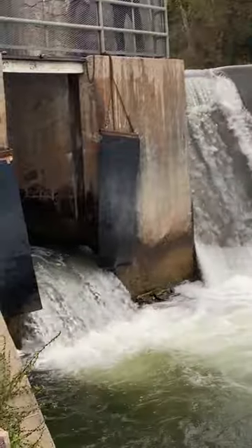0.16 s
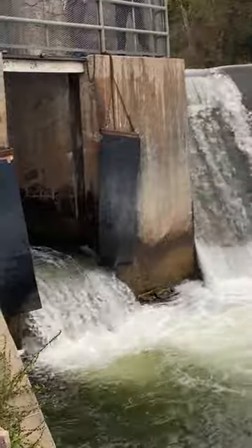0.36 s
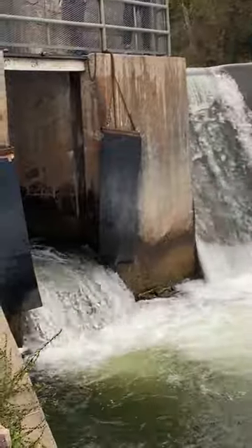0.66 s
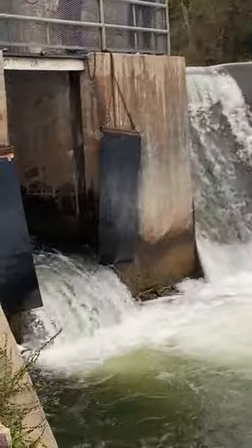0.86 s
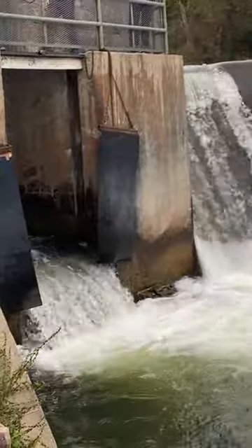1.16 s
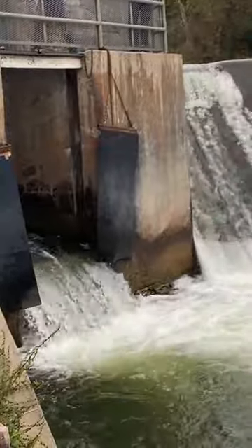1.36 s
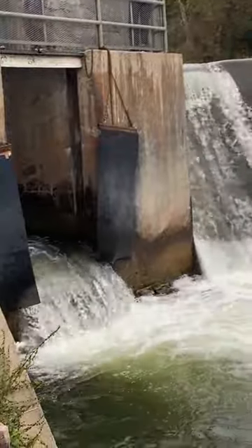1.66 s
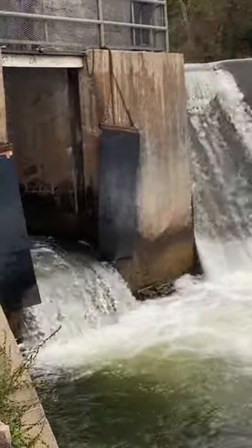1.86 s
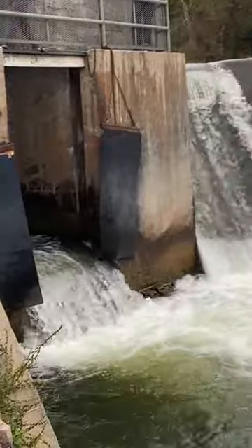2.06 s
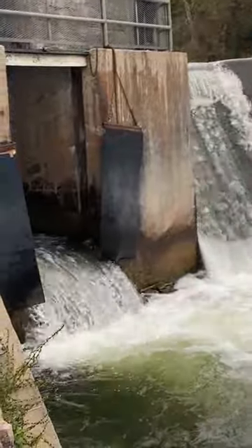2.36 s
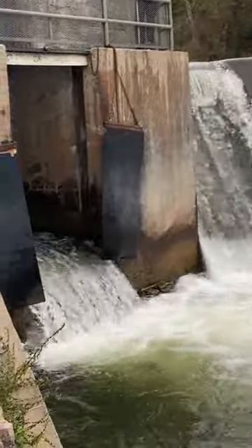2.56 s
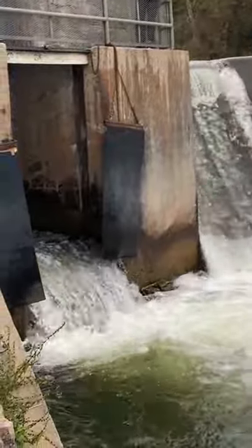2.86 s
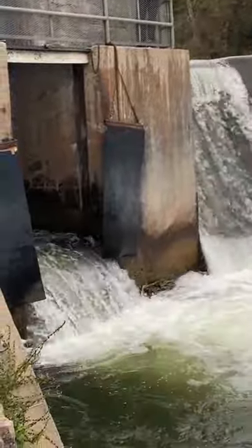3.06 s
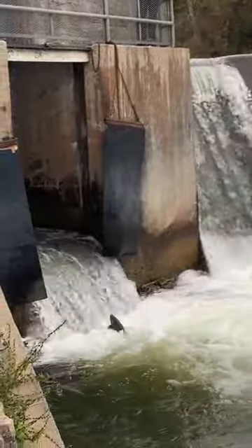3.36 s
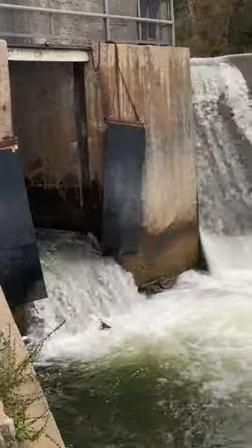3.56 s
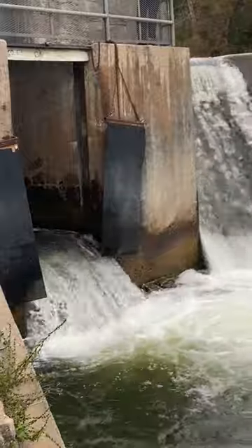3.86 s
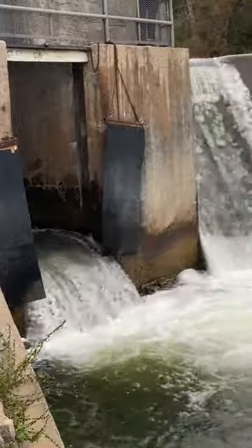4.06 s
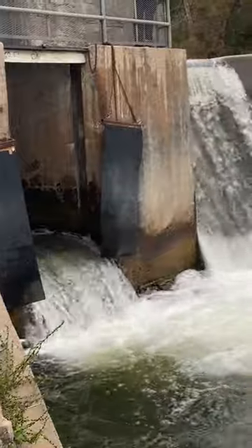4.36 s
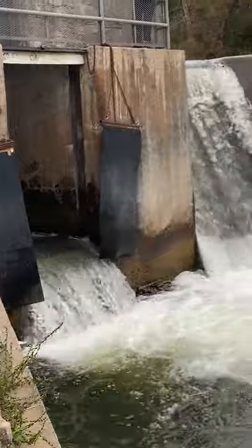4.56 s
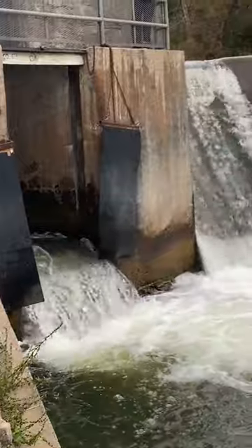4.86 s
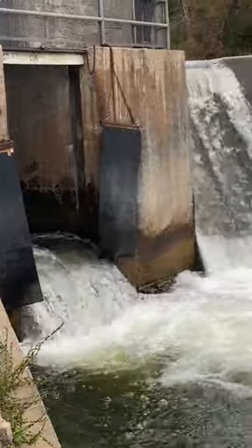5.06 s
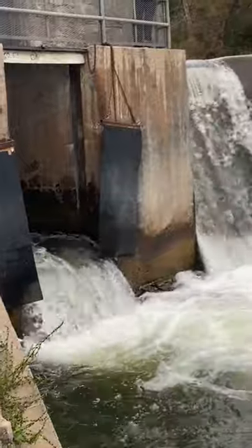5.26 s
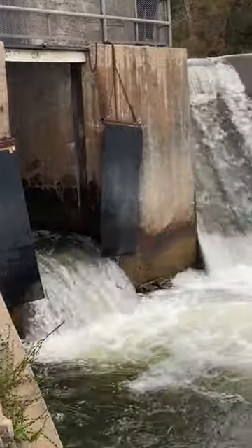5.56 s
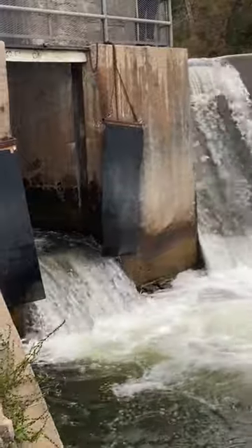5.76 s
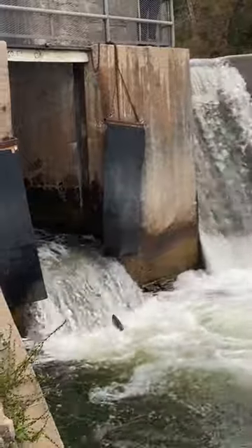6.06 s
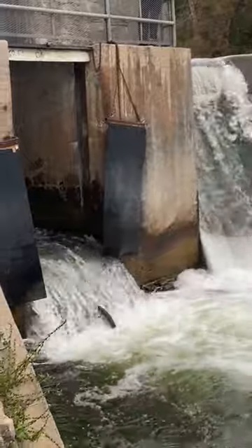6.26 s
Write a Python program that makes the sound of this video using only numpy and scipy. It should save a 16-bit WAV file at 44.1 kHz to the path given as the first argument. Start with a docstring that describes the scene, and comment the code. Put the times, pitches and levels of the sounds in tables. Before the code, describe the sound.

Water pours loudly and steadily over a concrete weir and through a sluice gate, rumbling, roaring and hissing into a churning pool.

```python
"""Weir and sluice gate

Water pours over a concrete weir and through a sluice gate into a churning pool, heard from the bank.
Filtered noise, lifted by surges, makes the rumble; patchy noise makes the pounding jets, the white-water
roar and the spray hiss. Swarms of damped rings add bubbles and drops; swelling, rising tones gulp and
plop; the gate chamber booms a little. Two closely spaced microphones hear it all, with level, phase and
likeness set over frequency."""
import sys
import numpy as np
from scipy import signal
from scipy.fft import rfft, irfft
from scipy.io import wavfile
from scipy.ndimage import uniform_filter1d

SR = 44100
rng = np.random.default_rng(int(sys.argv[2]) if len(sys.argv) > 2 else 0)


def persist_wave(psi):
    """Save psi, clipped to +-1, as 16-bit WAV."""
    counts = np.round(np.clip(psi, -1, 1) * 32767).astype(np.int16)
    wavfile.write(sys.argv[1], SR, np.atleast_2d(counts).T)


N = 282681
HZ = np.fft.rfftfreq(N, 1 / SR)
T_S = np.arange(N) / SR


def gain_of(db):
    """Decibels to amplitude."""
    return 10 ** (np.asarray(db) / 20)


def evened(x):
    """Scales to rms 1."""
    return x / np.sqrt(np.mean(x ** 2) + 1e-20)


def read(points):
    """Interpolates a table over HZ, on a log frequency axis."""
    f_hz, value = np.transpose(points)
    return np.interp(np.log(HZ + 1), np.log(f_hz + 1), value)


def coloured(x, db):
    """Filters x by the gain curve db, to rms 1."""
    return evened(irfft(rfft(x) * gain_of(db), N))


def steadied(x, size=11025):
    """Divides out slow loudness drifts, keeping fast flutter; size in samples."""
    power = uniform_filter1d(x ** 2, size, axis=1)
    power = uniform_filter1d(power, size // 2, axis=1)
    return x / np.sqrt(abs(power) + 1e-12)


def turbulence(patch_s, patch_hz, patchy_db):
    """Two unrelated noises whose level varies in short patches of time and frequency."""
    window, hop = 256, 64
    shape = (2, N // hop + 5, window // 2 + 1)
    re, im, patches = rng.standard_normal((3, *shape))
    span_frames, span_bins = patch_s * SR / hop, patch_hz * window / SR
    for axis, span in ((1, span_frames), (2, span_bins)):
        keep = np.exp(-1 / max(span, 1e-3))
        patches = signal.lfilter([1], [1, -keep], patches, axis=axis)
    z = (re + 1j * im) * gain_of(patchy_db * evened(patches))
    _, noise = signal.istft(z, nperseg=window, noverlap=window - hop, time_axis=1, freq_axis=2)
    return evened(noise[:, :N])


def rings(lo_hz, hi_hz, per_s, cycles, rise, spread_db, count=160):
    """A swarm of damped rings of many pitches and sizes; each climbs in pitch as it dies."""
    out = np.zeros((2, N))
    per_pitch = int(per_s * N / SR / count)
    for hz in np.geomspace(lo_hz, hi_hz, count):
        # age in decay times; one decay lasts the given cycles
        age = np.arange(int(5 * cycles * SR / hz) + 2) * hz / (SR * cycles)
        turns = cycles * (age + rise * age ** 2 / 2)
        ring = np.sin(2 * np.pi * turns) * np.exp(-age)
        ring *= np.sqrt(hz) / np.linalg.norm(ring)  # equal energy per Hz over log-spaced pitches
        place, chance, side = rng.random((per_pitch, 3)).T
        size = gain_of(spread_db * np.minimum(-np.log(1 - chance), 4))
        at = (place * N).astype(int)[:, None] + np.arange(len(ring))
        channel = (side * 2).astype(int)[:, None]
        np.add.at(out, (channel, at % N), size[:, None] * ring)
    return evened(out)


def sway(slow_hz, fast_hz, count=24):
    """Slow random wavering, a sum of sines at random phases, rms 1."""
    coarse = np.arange(0, N, 128)
    turns = np.geomspace(slow_hz, fast_hz, count)[:, None] * coarse / SR + rng.random((count, 1))
    waver = np.sin(2 * np.pi * turns).sum(0)
    return evened(np.interp(np.arange(N), coarse, waver))


# heavier slugs of water, negative = dip: peak t/s, rumble lift level/dB
SURGES = [(0.12, 4), (0.38, 4.5), (0.5, 2.5), (0.6, 0), (0.8, 0.5), (1.03, 4.5), (1.28, 0), (1.55, 1.2),
          (3.56, 2.5), (4.5, -3), (5.35, 1.3)]
SURGE_RISE_S, SURGE_EBB_S = 0.079, 0.15


def surge_db():
    """Plunge lift over time: Gaussian build-up, exponential ebb."""
    peak_s, lift_db = np.array(SURGES).T
    age_s = T_S - peak_s[:, None]
    shape = np.exp(-np.where(age_s < 0, (age_s / SURGE_RISE_S) ** 2, age_s / SURGE_EBB_S))
    return lift_db @ shape


# rumble spectrum: f/Hz, relative level/dB per Hz
RUMBLE = [(15, -44), (23, -22), (31, -11), (40, -7.5), (50, 4), (70, 0), (100, 2.3), (125, -12.5),
          (170, -36)]
RUMBLE_DB = -30.5


def rumble(sway_db=0.5):
    """The whole plume of trapped air heaves under the fall, following each surge in full."""
    heave = coloured(rng.standard_normal((2, N)), read(RUMBLE))
    force_db = surge_db() + sway_db * sway(slow_hz=1.4, fast_hz=4.7)
    return gain_of(RUMBLE_DB + force_db) * steadied(heave, size=5000)


# pounding spectrum without the chamber: f/Hz, relative level/dB per Hz
POUNDING = [(70, -35), (100, -6), (122, 0), (160, -2.5), (200, -1), (255, -2.5), (345, -4.5), (400, -10),
            (450, -19.5), (600, -46)]
POUNDING_DB, POUNDING_SHARE = -24.5, 0.14  # share of the surge lift
CHAMBER_HZ, CHAMBER_WIDTH_HZ, CHAMBER_LIFT_DB = 294.5, 32, 3.6


def pounding(sway_db=0.27):
    """Large air pockets thud in the plunge; the gate chamber's resonance lifts one band."""
    boom_db = CHAMBER_LIFT_DB / (1 + (2 * (HZ - CHAMBER_HZ) / CHAMBER_WIDTH_HZ) ** 2)
    thuds = turbulence(patch_s=0.046, patch_hz=150, patchy_db=1.26)
    thuds = coloured(thuds, read(POUNDING) + boom_db)
    force_db = POUNDING_SHARE * surge_db() + sway_db * sway(slow_hz=2.2, fast_hz=6.5)
    return gain_of(POUNDING_DB + force_db) * steadied(thuds, size=5000)


# white-water spectrum: f/Hz, relative level/dB per Hz
CHURN = [(300, -29), (420, -6), (470, -2), (530, -1.5), (680, 0), (800, -2), (940, -7.5), (1080, -6.5),
         (1350, -5.5), (1740, -6.5), (1900, -11.5), (2130, -8), (2650, -14), (3600, -28)]
CHURN_DB, LARGE_BUBBLES_HZ = -25.5, 1000  # large bubbles ring below this pitch


def churn(wash_db=0.0, bubbles_db=-7.5):
    """Countless bubbles merge with the wash into a roar, large and small steadied apart."""
    wash = turbulence(patch_s=.012, patch_hz=300, patchy_db=0.1)
    bubbles = rings(lo_hz=351.3, hi_hz=3204, per_s=3500, cycles=11.5, rise=.015, spread_db=-1)
    water = gain_of(wash_db) * wash + gain_of(bubbles_db) * bubbles
    water = coloured(water, read(CHURN))
    large = irfft(rfft(water) * (HZ < LARGE_BUBBLES_HZ), N)
    small = water - large
    roar = sum(part.std() * steadied(part, size=4000) for part in (large, small))
    return gain_of(CHURN_DB) * roar


# spray spectrum: f/Hz, relative level/dB per Hz
SPRAY = [(1800, -28), (2600, -3.5), (2900, 1.3), (3100, -.3), (3350, .6), (3520, -1.9), (3900, -.6),
         (4150, -.9), (4350, -2.7), (4700, -2.4), (5000, -3.1), (5300, -1.8), (5650, -2.5), (6000, -.9),
         (6250, -.9), (6420, -2.8), (6850, -.9), (7020, -3.3), (7300, -2.4), (7550, -4.1), (8150, -1.3),
         (8500, -2.6), (10000, -4.3), (11100, -4.5), (11500, -6), (12200, -5.4), (13300, -8.3),
         (15600, -8.7)]
SPRAY_DB = -27.9


def spray(hiss_db=0.0, drops_db=-6.5):
    """Bursting foam hisses as patchy noise; thrown drops patter as short rings."""
    hiss = turbulence(patch_s=0.02, patch_hz=600, patchy_db=1.63)
    drops = rings(lo_hz=2010, hi_hz=15990, per_s=12000, cycles=13.0, rise=0.021, spread_db=2.0)
    water = gain_of(hiss_db) * hiss + gain_of(drops_db) * drops
    return gain_of(SPRAY_DB) * steadied(coloured(water, read(SPRAY)))


def pockets(rows, swell_s, decay_s, octaves_per_s):
    """Each air pocket swells, rings and dies, climbing in pitch; shared part of the field only."""
    out = np.zeros(N)
    for (peak_s, hz, db), turn in zip(rows, rng.random(len(rows))):
        age_s = T_S - peak_s
        near = abs(age_s) < .25
        age_s = age_s[near]
        swell = np.exp(-np.where(age_s < 0, (age_s / swell_s) ** 2, age_s / decay_s))
        turns = turn + np.cumsum(hz * 2 ** (octaves_per_s * age_s)) / SR
        out[near] += gain_of(db) * swell * np.sin(2 * np.pi * turns)
    return np.array([out, np.zeros(N)])


# big trapped-air pockets: peak t/s, f/Hz at peak, level/dB ahead of the microphones
GULPS = [(0.08, 137.5, -21), (0.097, 274, -22.5), (0.129, 65, -21), (0.179, 81.2, -19), (0.358, 75, -15),
         (0.405, 70, -21), (0.456, 328, -23), (0.476, 70, -26), (0.486, 102, -23.5), (0.572, 113.7, -27),
         (0.617, 75.3, -22), (0.54, 196, -23), (0.62, 258, -24), (0.63, 199.7, -22), (0.708, 64, -20),
         (0.87, 280, -24.5), (0.99, 54.3, -21), (1.036, 291, -21), (1.08, 70, -23), (1.162, 129.3, -23),
         (1.232, 296, -24), (1.29, 74.4, -21), (1.295, 310, -25.5), (1.55, 145, -23), (1.602, 231, -21.5),
         (1.785, 178, -18.5), (2.154, 314, -20), (2.254, 173, -23), (2.68, 301, -18), (2.914, 291, -19),
         (2.992, 301, -20), (3.056, 301, -25), (3.167, 124.5, -23), (3.55, 45, -21), (3.648, 107.3, -24),
         (3.927, 69.5, -21), (4.381, 285, -23), (4.499, 75.9, -23), (4.634, 103, -27), (4.728, 275, -24),
         (4.802, 118, -22), (5.158, 253, -23), (5.288, 122.7, -21), (5.359, 269, -21.5),
         (5.416, 143.3, -24), (5.519, 296, -20.5), (5.625, 134.7, -19), (5.75, 113.3, -26),
         (6.181, 296, -23)]


def gulps():
    """Big pockets of trapped air gulp in the plunge, rising in pitch as they ascend."""
    return pockets(GULPS, swell_s=.02, decay_s=.025, octaves_per_s=.9)


# bubble clouds: peak t/s, length/s, centre f/Hz, lift level/dB
BOILS = [(0.134, 0.074, 680, 3.5), (0.408, .08, 680, 2.5), (0.768, .12, 680, 2.5), (0.82, .2, 1500, 1.3),
         (1.5, .2, 680, 2.3), (1.76, .14, 1400, 1), (1.934, .12, 680, 3), (2.2, 0.17, 1650, 1.3),
         (2.72, .16, 680, 1.4), (3.17, .24, 704, 2.2), (3.52, 0.062, 680, 4), (3.76, .08, 1400, 1.6),
         (4.07, .07, 680, 2.3), (4.17, .07, 680, 4), (4.31, .15, 660, 3.5), (4.55, .14, 1400, 1.7),
         (4.93, .25, 680, 1.8), (5.13, .08, 1450, 2), (5.63, 0.072, 680, 2), (5.64, .14, 1500, 2)]
BOIL_OCTAVES, BETWEEN_BOILS_DB = 0.38, -.5  # 1/e half-width in pitch; roar gain between clouds


def boiling(water):
    """Each cloud of bubbles that wells up lifts the roar around its own pitch."""
    out = water * gain_of(BETWEEN_BOILS_DB)
    for peak_s, length_s, hz, lift_db in BOILS:
        near = abs(T_S - peak_s) < 2 * length_s
        part = water[:, near]
        size = part.shape[1]
        f_hz = np.fft.rfftfreq(size, 1 / SR)
        band = np.exp(-(np.log2((f_hz + 1) / hz) / BOIL_OCTAVES) ** 2)
        cloud = irfft(rfft(part) * band, size)
        swell = np.exp(-(2 * (T_S[near] - peak_s) / length_s) ** 2)
        out[:, near] += (gain_of(lift_db) - 1) * swell * cloud
    return out


# jet thins briefly, negative = lift: centre t/s, drop level/dB
LULLS = [(0.21, 1), (0.3, 0), (0.68, 2.5), (0.93, 3), (1.2, 3), (1.42, 3), (1.71, 4.5), (2.34, 4), (2.5, 1),
         (3.11, 1.5), (3.22, 3.5), (3.39, 3), (3.77, 3), (4.11, 3), (4.26, 3), (4.56, 0), (5.06, -1),
         (6.24, 2)]
LULL_S = 0.024  # 1/e half-width


def lull_db():
    """Plunge drop over time: the jet thins for a moment and the plunge slackens."""
    centre_s, drop_db = np.array(LULLS).T
    age_s = T_S - centre_s[:, None]
    return drop_db @ np.exp(-(age_s / LULL_S) ** 2)


# single foam bubbles: peak t/s, f/Hz at peak, level/dB ahead of the microphones
PLOPS = [(0.479, 1870, -33), (0.678, 1520, -27), (1.141, 829, -26), (1.162, 1475, -28), (1.583, 702, -22),
         (1.727, 1378, -29), (2.242, 452, -25), (2.519, 1637, -28), (4.069, 680, -23), (4.299, 661, -21),
         (4.656, 2304, -29), (4.897, 1292, -28), (5.114, 1464, -28.5), (5.718, 1938, -33),
         (6.163, 1949, -31)]


def plops():
    """Single bubbles plop out of the foam: small, quick gulps."""
    return pockets(PLOPS, swell_s=.006, decay_s=.012, octaves_per_s=1.5)


# left minus right: f/Hz, level/dB
BALANCE = [(140, 0), (310, 3.4), (380, 0), (460, -.5), (570, -9), (700, -4.5), (870, -1.3), (990, -7.9),
           (1220, 0), (1900, 0), (2250, -5.6), (2750, -4.1), (3100, 0)]
# left phase lead, excluding the port lag: f/Hz, lead/rad
LEAD = [(140, 0), (300, -0.46), (440, -1.62), (520, -1.3), (600, -0.09), (700, -0.46), (930, -1.54),
        (1060, 0.25), (1350, -0.05), (2000, 0.1), (2450, 0.8), (2700, 1.5), (3500, 1.5), (3750, 1.18),
        (4100, 1.15), (4700, 1.35), (5300, 1.48), (6400, 1.8), (7300, 1.1), (8300, 1.45), (9700, 1.35),
        (10600, 1.7), (12000, 1.45), (13300, 1.4), (14700, 1.85)]
# left-right likeness: f/Hz, likeness/0-1
LIKENESS = [(150, 1), (300, .99), (430, .88), (530, .54), (650, .94), (880, .93), (980, .41), (1100, .87),
            (1350, .995), (1880, .99), (2200, .69), (2550, .27), (2950, .74), (4100, .75), (4700, .97),
            (5400, .78), (6600, .89), (9000, .88), (15000, .88)]
PORT_LAG_S, LAG_FROM_HZ = .000233, 3500  # extra right-port delay for treble


def microphones(field):
    """Both ports share one part of the field and differ by the other; treble reaches the left first."""
    shared, apart = rfft(field)
    likeness = np.clip(read(LIKENESS), 0, 1)
    shared = shared * np.sqrt((1 + likeness) / 2)
    apart = apart * np.sqrt((1 - likeness) / 2)
    lag_rad = 2 * np.pi * PORT_LAG_S * np.maximum(HZ - LAG_FROM_HZ, 0)
    lead_rad = read(LEAD) + lag_rad
    ratio = gain_of(read(BALANCE))
    left = (shared + apart) * ratio
    right = (shared - apart) * np.exp(-1j * lead_rad)
    return irfft(np.array([left, right]) * np.sqrt(2 / (1 + ratio ** 2)), N)


def scene():
    """All the water, as it reaches the two microphones."""
    gulping, plopping = gulps(), plops()
    plunge = gain_of(-lull_db()) * (rumble() + pounding()) + gulping
    return microphones(plunge + boiling(churn()) + plopping + spray())


EDGE_HZ = 15780


def record(dry):
    """The recorder's band limit, a linear-phase low-pass."""
    low_pass = signal.firwin(1023, EDGE_HZ, window=("kaiser", 9), fs=SR)
    return signal.oaconvolve(dry, low_pass[None], "same", axes=1)


dry = scene()
out = record(dry)
persist_wave(out)
```